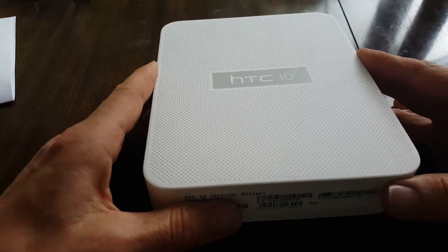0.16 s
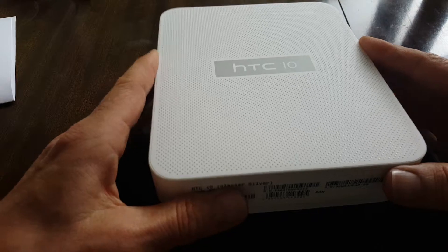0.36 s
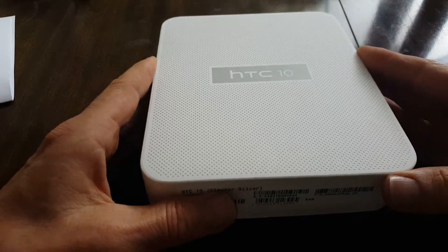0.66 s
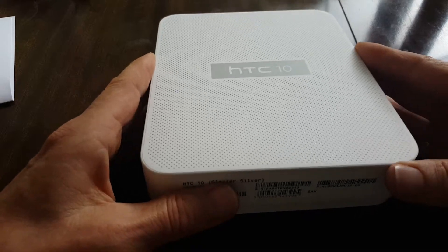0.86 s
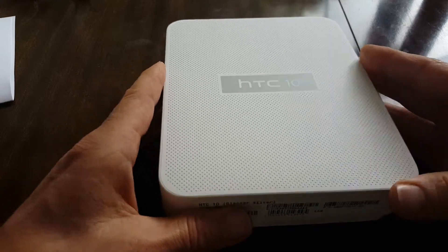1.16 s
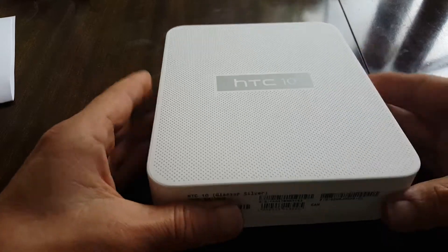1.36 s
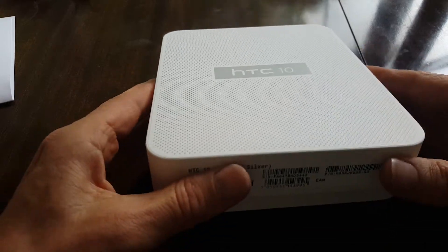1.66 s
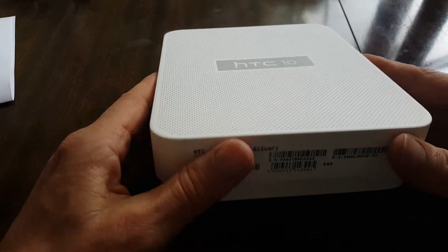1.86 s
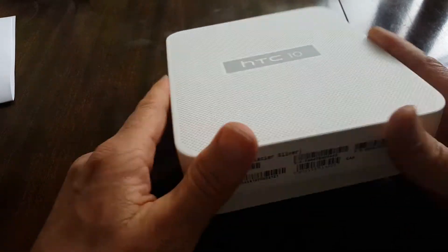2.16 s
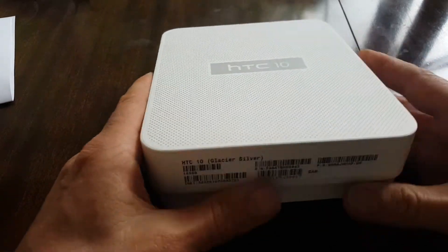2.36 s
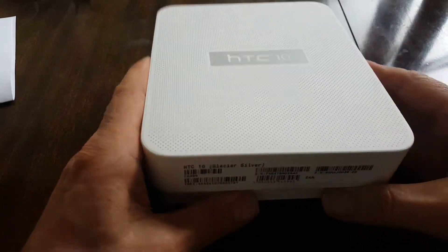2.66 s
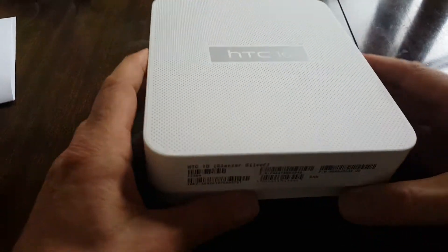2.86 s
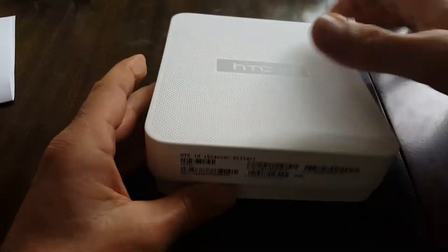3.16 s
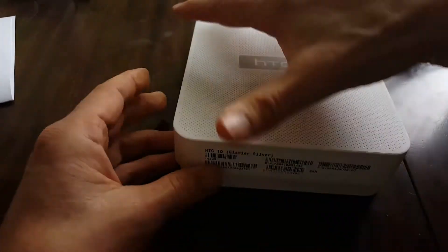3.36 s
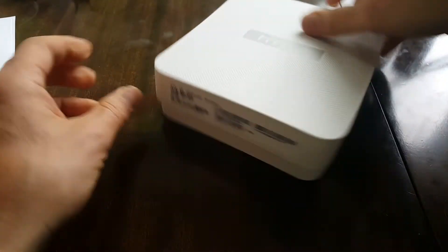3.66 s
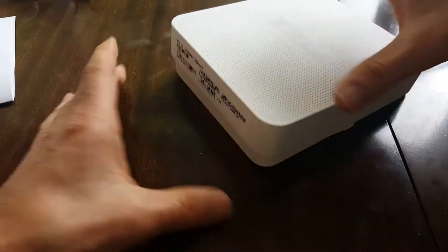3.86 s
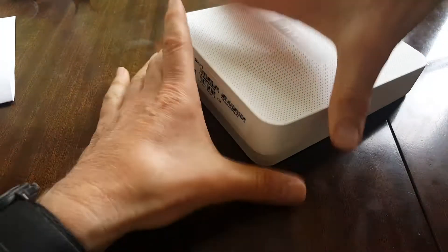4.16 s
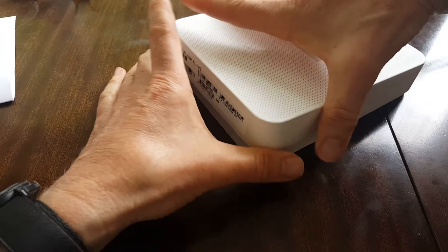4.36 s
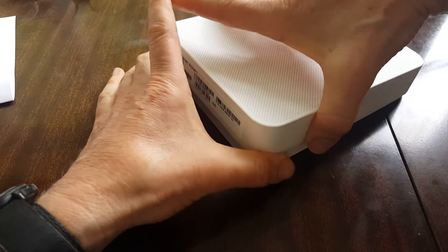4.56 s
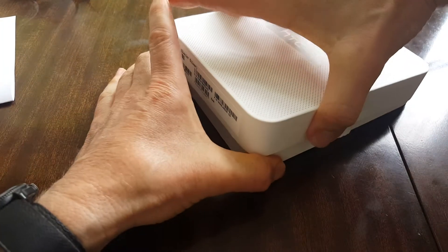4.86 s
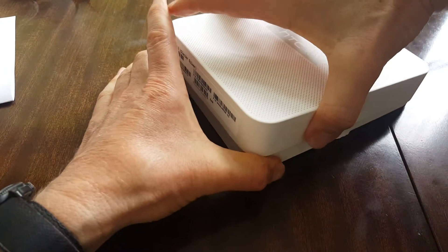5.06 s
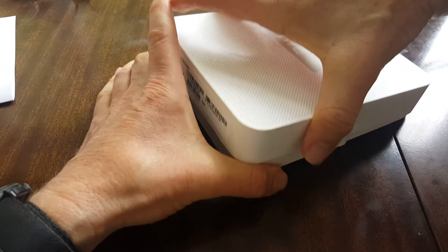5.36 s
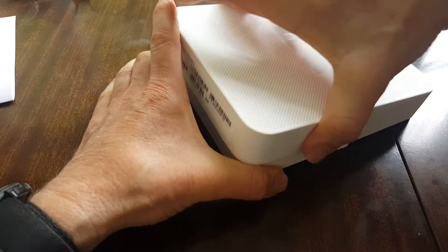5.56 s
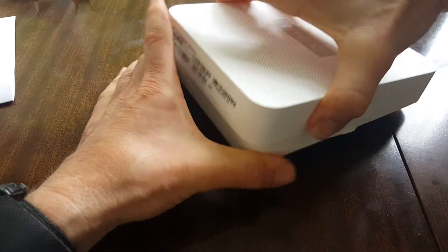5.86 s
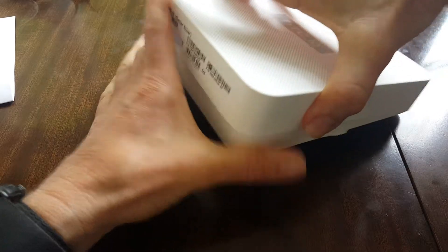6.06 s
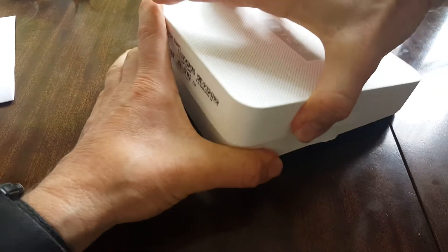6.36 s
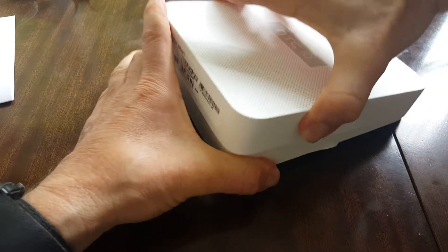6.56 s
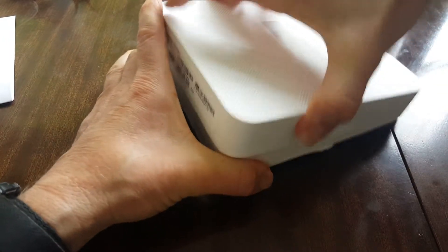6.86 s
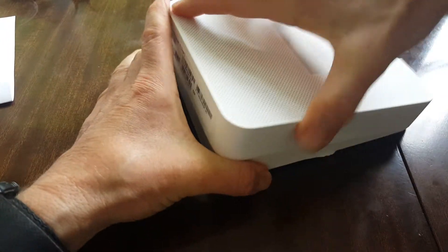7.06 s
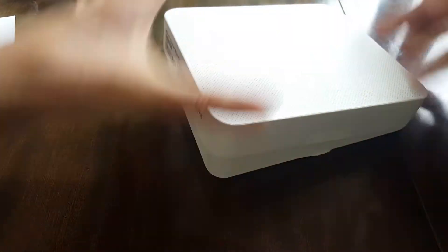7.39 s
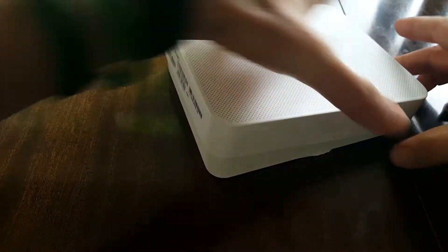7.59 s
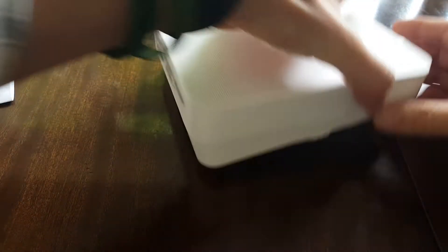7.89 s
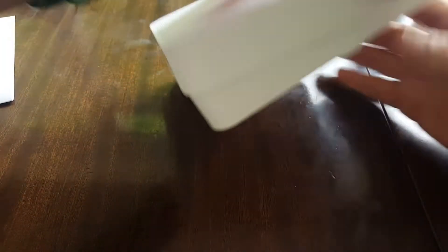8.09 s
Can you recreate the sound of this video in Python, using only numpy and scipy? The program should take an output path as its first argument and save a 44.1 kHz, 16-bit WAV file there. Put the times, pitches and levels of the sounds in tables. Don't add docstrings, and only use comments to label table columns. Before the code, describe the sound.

Light fingertip taps and dry card rubs, then hard hollow box knocks and heavy table thuds in a small quiet furnished room.

```python
import sys
import numpy as np
from scipy import signal
from scipy.fft import rfft, irfft
from scipy.io import wavfile

SR = 44100
rng = np.random.default_rng(int(sys.argv[2]) if len(sys.argv) > 2 else 0)


def voltage_ratio(level):
    return 10 ** (np.asarray(level, float) / 20)


def unload_wav(signal):
    wavfile.write(
        sys.argv[1],
        SR,
        np.round(np.clip(np.atleast_2d(signal).T, -1, 1) * 32767).astype(np.int16),
    )


N = 362943
TIME = np.arange(N) / SR

# (frequency [Hz], level per Hz [dB])
AIR = [(25, 17.5), (108, -6.5), (300, -12), (700, -19), (1100, -17.5), (3500, -25.5), (9000, -33.5),
       (16000, -27)]
AIR_DB = -53
# (frequency [Hz], level [dB])
HUM = [(1361, -70.5), (2724, -82), (2229, -86)]
# (time [s], body rumble [dB], panel rustle [dB])
SHIFT = [
    (0.0, -69, -60.5),
    (3.14, -57, -43.5),
    (3.21, -29.5, -58),
    (3.94, -70.5, -56.5),
    (6.17, -62.5, -64.5),
    (7.17, -69, -37),
    (7.57, -62, -53),
    (8.23, -50, -53),
]
# (time [s], rise [ms], fall [ms], level [dB])
DRAGS = [(0.0, 3, 12.5, -53), (0.203, 5.6, 16.5, -46.5), (0.831, 12.2, 13.4, -47.5), (0.99, 11, 11, -56),
         (1.92, 22, 14, -48), (2.052, 20.6, 16.5, -43), (2.454, 20, 86, -56.5), (3.75, 74, 89, -59),
         (4.252, 16.6, 16, -44.5), (4.369, 32, 60, -57), (4.602, 10, 35, -61.5), (4.716, 25.6, 21, -48),
         (4.81, 13.5, 49, -48), (5.266, 31, 35, -53), (5.506, 41.5, 29, -44.5), (5.603, 17, 10.6, -47.5),
         (5.678, 18, 51, -63), (6.296, 8.4, 18.3, -38.5), (6.371, 28, 22, -48), (6.734, 25, 17, -50),
         (7.13, 15, 43, -44), (7.217, 16, 24, -43.5), (7.28, 18, 55, -44), (6.105, 11.4, 12, -54.5),
         (8.169, 108, 170, -58)]
DRAG_RASP_DB, DRAG_HISS_DB = -23, -20
# (time [s], half length [ms], level [dB], hiss re level [dB])
BRUSHES = [(0.258, 23.5, -49.5, -10), (0.324, 13.4, -59, 4), (0.429, 16.5, -59, -6.5),
           (0.641, 20, -58.5, -11), (1.195, 21, -61, -7), (1.305, 17, -62.5, -3.5), (1.391, 26, -58, -5),
           (1.632, 31, -60.5, 1), (2.172, 20.3, -44.5, -9), (2.323, 10.5, -58, 2.5), (2.46, 23, -63.5, 1.5),
           (2.51, 32, -70, -1), (2.6, 32, -53.5, -17), (2.697, 9.8, -48.5, -0.5), (2.753, 18, -58, -4.5),
           (2.85, 42, -61.5, -2), (3.68, 105, -63, -4), (4.1, 140, -84, 13), (4.865, 15, -58, -4),
           (5.176, 7.2, -44, -11), (5.955, 12.4, -60.5, 0.5), (6.123, 31, -67.5, 6), (6.91, 12, -50, 3),
           (3.08, 25, -57, 0.5), (7.712, 20, -63, -8), (7.82, 32, -59.5, -8), (7.89, 25, -59.5, -11)]
BRUSH_RASP_DB = -4
# (frequency [Hz], level [dB])
BODY = [(70, -25.5), (98, -4), (133, -5), (175, -1), (222, 0), (256, 3.5), (290, -9), (345, 4), (420, -4),
        (500, 2)]
# (frequency [Hz], width [Hz], level [dB])
PANELS = [(620, 362, -2.5), (919, 340, 4), (1090, 250, 4), (1340, 396, 0), (1697, 900, -4.5),
          (2053, 360, -4.5), (2796, 290, -13.5)]
# (time [s], peak [dB], strongest pitch [Hz])
BLOWS = [(0.002, -47, 367), (0.192, -43.5, 292), (0.256, -44, 380), (0.317, -35, 128), (0.628, -46, 347),
         (1.878, -33.5, 383), (2.038, -56, 384), (2.158, -19, 272), (2.488, -34, 229.5), (2.675, -41, 250),
         (2.902, -37.5, 91), (3.103, -16, 360), (6.888, -15.5, 100), (3.232, -14.5, 116),
         (3.304, -16.5, 273), (4.526, -47.5, 150.4), (4.779, -40, 126), (4.819, -29.5, 333),
         (5.443, -36.5, 362), (5.667, -30.5, 142), (6.285, -38.5, 374), (6.456, -30.5, 327),
         (6.508, -20, 290), (6.746, -31.5, 356), (7.211, -26, 151), (7.703, -43, 207), (7.829, -38, 227),
         (8.097, -31.5, 214), (8.168, -39, 241)]
# (time [s], peak [dB], strongest pitch [Hz], rattle [dB], rattle fall [ms])
SLAMS = [(1.441, -17, 290, -37.5, 34), (2.207, -7.5, 260, -39, 43), (2.693, -21.5, 250, -52, 32),
         (3.059, -9, 141, -35, 82), (3.263, -15, 290, -23, 12), (3.39, -20, 154, -33, 17.5),
         (5.181, -27.5, 127.7, -53.5, 16), (6.494, -4.5, 280, -28, 14), (6.893, -13.5, 250, -33, 38),
         (7.096, -12, 358.5, -29, 17), (7.236, -10, 430, -36, 41), (7.46, -16.5, 184, -45, 13)]
RATTLE_LAG_S, RATTLE_RISE_MS, RATTLE_RASP_DB, RATTLE_HISS_DB = 0.004, 2, -34, -39
# (time [s], peak [dB])
JOLTS = [(3.539, -40), (3.597, -31.5), (3.671, -36), (3.794, -36.5), (3.81, -34), (3.854, -39.5),
         (3.918, -35), (4.026, -35.5), (4.14, -43), (4.168, -37.5), (4.255, -37.5), (4.371, -36.5),
         (4.432, -40), (4.464, -40), (4.639, -42), (5.334, -41.5), (5.769, -38.5), (5.953, -40.5),
         (5.997, -39.5), (6.068, -41.5), (6.099, -38), (6.149, -44), (6.181, -38), (6.225, -37.5),
         (6.313, -28), (6.381, -31.5), (6.433, -36), (6.854, -36)]
JOLT_HZ, JOLT_RISE_HZ_PER_S = 196.4, 20
JOLT_TAP_DB, JOLT_TAP_HZ = -10.5, 860
# (time [s], peak [dB], panel pitch [Hz], body [dB])
TAPS = [(0.3156, -31.5, 1000, -66), (0.5952, -36.5, 1116, -43.5), (0.82, -36, 724, -38),
        (0.933, -42, 910, -44), (1.0974, -43, 960, -47), (1.132, -35, 1050, -35.5),
        (1.174, -37.5, 1010, -65), (1.363, -37.5, 1330, -47.5), (1.5956, -30.5, 1115, -35.5),
        (1.833, -36.5, 880, -42), (2.0993, -33, 900, -42), (2.3613, -34, 520, -28.5),
        (2.446, -26.5, 600, -31.5), (2.5146, -30, 860, -34.5), (2.609, -34, 1090, -38),
        (2.7852, -32.5, 695, -37), (3.4232, -25.5, 520, -25), (3.5813, -45, 1280, -56),
        (3.8361, -32, 1740, -54), (3.9, -31.5, 2370, -38), (4.7755, -34.5, 1020, -34),
        (4.8036, -28, 650, -42), (4.898, -34, 577, -32), (5.1718, -37, 1120, -40), (5.666, -31.5, 604, -44),
        (5.94, -38, 950, -54), (6.8922, -10, 940, -44), (7.123, -16, 710, -20), (7.2682, -25, 543, -28),
        (7.4578, -25, 493, -39)]
TAP_EDGE_DB, TAP_TICK_DB, TAP_BODY_HZ = -18, -43.5, 260.4
# (time [s], peak [dB], panel pitch [Hz], edge [dB])
KNOCKS = [(1.4305, -4, 1350, -29), (1.4404, -12, 870, -27), (1.8787, -26.5, 960, -51),
          (2.1573, -21, 900, -18.5), (2.1717, -23.5, 890, -39), (2.194, -15, 1200, -17.5),
          (2.2061, -4.5, 744, -27), (2.2367, -6, 620, -21), (2.2634, -30, 547, -59.5),
          (2.2939, -21.5, 670, -51), (2.343, -29, 770, -50), (2.6995, -23.5, 630, -54.5),
          (2.7479, -24.5, 1030, -52), (3.0554, -4, 1130, -36), (3.0651, -9.5, 1450, -37),
          (3.1033, -8, 1490, -16), (3.131, -14, 1450, -20), (3.23, -9.5, 2270, -10),
          (3.2672, -9.5, 1370, -5), (3.2712, -12.5, 1500, -12), (3.302, -17.5, 1480, -5),
          (3.3258, -20.5, 1350, -46), (3.38, -23, 780, -58.5), (3.394, -14.5, 493, -10.5),
          (6.4675, -21, 480, -19), (6.4886, -10, 1074, -14), (6.4939, -7, 770, -2),
          (6.8858, -7.5, 950, -22), (7.096, -10, 567, -45), (7.2366, -11, 577, -42)]
KNOCK_TICK_DB = -34.5
# (time [s], edge [dB], tick [dB])
CLICKS = [(0.25, -23, -33.5), (0.3146, -62, -34.5), (0.339, -23.5, -46), (0.414, -26.5, -70),
          (1.132, -25, -44), (1.1735, -60, -44), (1.206, -65, -50), (1.363, -56, -61), (2.0998, -22, -41),
          (2.106, -55.5, -41.5), (2.1575, -26.5, -18), (2.5156, -14.5, -35.5), (2.5798, -22, -67),
          (2.693, -25, -43), (2.7481, -55, -45), (2.8567, -58, -38.5), (3.0565, -41, -40),
          (3.2006, -17.5, -36.5), (3.3015, -26, -53), (3.3975, -48, -30.5), (3.4376, -23, -54),
          (3.648, -25, -43.5), (3.672, -30, -62), (5.1717, -28, -48), (6.4693, -46, -31.5),
          (7.2387, -52, -35), (7.2456, -16.5, -62), (7.831, -25.5, -36), (8.1086, -24, -68),
          (8.209, -33, -56)]
CLICK_PANEL_DB, CLICK_PANEL_HZ = -31, 1100
# (time [s], peak [dB], panel pitch [Hz], edge [dB], tick [dB])
NICKS = [(0.424, -47, 860, -52, -57), (1.401, -46, 1240, -50, -58), (2.162, -24, 939, -36, -36),
         (2.211, -11, 855, -33, -50), (2.226, -23, 790, -40, -58), (2.252, -20.5, 1160, -42, -50),
         (2.906, -54, 1360, -35, -52), (3.0995, -14.5, 824, -40, -58), (3.151, -24, 1370, -42, -58),
         (3.25, -23, 1470, -38, -35), (3.483, -59, 824, -50, -53), (4.139, -58, 1520, -38, -63),
         (4.225, -41, 1120, -52, -52), (4.254, -31, 1170, -53, -43), (4.349, -42, 982, -52.5, -55),
         (4.596, -45.5, 946, -54, -65), (4.846, -36.5, 900, -48, -47.5), (4.934, -45, 1090, -44, -63),
         (4.978, -60, 1350, -40, -53.5), (5.152, -50, 1133, -46.5, -59), (5.173, -34.5, 1100, -41, -52),
         (5.223, -43, 1430, -50, -50), (5.338, -49, 1050, -50, -58), (5.424, -48, 1130, -57, -62),
         (2.1915, -31.5, 1114, -37, -33.5), (7.125, -35, 1060, -48, -54), (6.095, -55, 980, -46, -51),
         (6.277, -67, 1340, -55, -50), (7.081, -32, 930, -48, -70), (7.21, -28.5, 905, -36, -51),
         (7.58, -46, 1270, -36, -52.5), (7.702, -39.5, 1000, -30, -61), (7.762, -61, 1350, -57, -67),
         (8.16, -44, 1400, -29, -61)]
CRACK_DB, CRACK_T60_S = -11.5, 0.0095
TICK_TAIL_DB, TICK_TAIL_T60_S = -18, 0.041
# (time [s], peak [dB], pitch [Hz])
SNAPS = [(1.431, -19, 1900), (2.195, -11, 2200), (2.2065, -14, 1500), (2.237, -23, 1600),
         (3.0562, -19, 1480), (3.2305, -8.5, 2400), (3.267, -12, 2000), (3.3025, -13, 2200),
         (3.327, -23.5, 2510), (6.489, -15.5, 1970), (6.494, -13, 1910), (6.8855, -8.5, 2170),
         (7.0965, -18, 2000), (7.24, -27, 2600), (7.27, -39, 2500), (0.505, -46, 1800), (3.345, -37, 1500)]
# (time [s], peak [dB], pitch [Hz])
POPS = [(1.431, -10, 474), (1.441, -17, 490), (1.465, -26, 470), (2.168, -25, 520), (2.226, -29, 704),
        (2.262, -25, 600), (2.312, -29, 790), (3.058, -19, 600), (3.381, -17, 803), (4.333, -45, 773),
        (4.367, -38, 980), (4.688, -45, 480), (4.705, -35, 470), (4.706, -34, 1090), (4.716, -34, 497),
        (4.725, -36, 520), (4.825, -35, 1000), (4.891, -35.5, 547), (5.248, -48, 780), (5.357, -48.5, 930),
        (5.445, -43, 970), (5.456, -36, 1110), (5.485, -43, 610), (5.586, -33, 1040), (6.455, -34, 450),
        (6.503, -18, 516), (6.518, -20, 484), (6.55, -21.5, 497), (6.888, -20, 465), (6.9, -19, 463),
        (6.91, -28, 620), (6.945, -24, 477), (7.064, -36, 550), (7.105, -26, 480), (7.245, -16.5, 500),
        (2.24, -14, 560), (1.138, -35, 379), (6.168, -41, 300), (6.252, -42, 320), (6.322, -31, 280),
        (6.285, -36, 500)]
# (time [s], peak [dB], pitch [Hz])
RINGS = [(1.3625, -34.5, 1260), (1.4315, -15, 2200), (1.441, -21, 2200), (3.0565, -8.5, 1220),
         (3.104, -6.5, 1410), (3.1315, -14.5, 1500), (3.2305, -15.5, 2400), (3.251, -27, 1400),
         (3.2715, -10, 1500), (3.303, -16.5, 1430), (3.836, -32, 1730), (6.469, -20.5, 1126),
         (6.4945, -14.5, 1850), (6.886, -14, 1120), (7.097, -26, 2300), (2.1955, -19, 1350),
         (2.2375, -20, 1510), (4.777, -40, 1050), (3.4, -18, 2050), (1.8, -40, 800), (6.139, -49, 3650),
         (6.162, -48, 3650), (6.252, -54, 2200), (5.942, -43, 2850), (1.3, -49, 800), (6.29, -44, 2800),
         (3.3275, -27, 2200), (2.344, -27, 900), (7.097, -16, 1020)]
# (frequency [Hz], level re blow [dB], time to fall 60 dB [s])
TABLE = [(59.9, -22, 0.1), (76.4, -11.5, 0.13), (103, -16.5, 0.18)]
TABLE_SWELL_S = 0.032
# (time [s], level [dB])
BOOMS = [
    (1.437, -17),
    (2.159, -18),
    (3.063, -24),
    (3.394, -13),
    (4.16, -24),
    (5.399, -26.5),
    (6.896, -7),
    (7.096, -1),
    (7.236, -30),
    (7.701, -20),
]
BUZZ_DB, BUZZ_T60_S = -6.5, 0.11
BUZZ_LATE_DB, BUZZ_LATE_T60_S = -13, 0.43
# (time [s], frequency [Hz], level [dB], time to fall 60 dB [s])
JINGLE = [
    (6.901, 6870, -51, 0.25),
    (6.899, 6150, -52, 0.1),
    (6.9, 5650, -61, 0.45),
    (6.9, 8250, -51, .15),
    (7.26, 4950, -60, 0.4),
]
# (frequency [Hz], level [dB])
SIDE_DB = [(60, -19), (500, -13), (1000, -6.5), (4000, -1.5), (8000, 2), (13000, -2.5)]
# (frequency [Hz], time to fall 60 dB [s], level [dB])
ROOM = [(90, 0.4, -21.5), (250, 0.45, -14.5), (600, 0.19, -11), (1200, 0.82, -20.5), (2244, 0.4, -4),
        (5000, 0.2, 6.5), (10000, .2, -17)]
# (frequency [Hz], level [dB])
MIC = [(9000, -1.5), (10300, -6), (13700, -1), (14600, -12.5), (15600, -1), (15900, -39)]
# (frequency [Hz], level [dB])
LEAN_DB = [(300, 0.2), (600, -0.3), (1100, 1.3), (2200, 2.5), (4200, -2.5), (8000, -2), (13000, 1.5)]


def unit(x):
    return x / np.sqrt(np.mean(x ** 2))


def band(x, lo_hz, hi_hz, order=2):
    limits = [lo_hz, min(hi_hz, 0.49 * SR)]
    return signal.sosfilt(signal.butter(order, limits, "band", fs=SR, output="sos"), x)


def sine(hz, t):
    return np.sin(2 * np.pi * hz * t)


def decay(t, t60):
    return np.exp(-np.log(1000) * t / max(t60, 0.002))


def add(out, s, x):
    i = max(int(s * SR), 0)
    out[i:i + len(x)] += x[:N - i]


def curve(table):
    hz, db = np.transpose(table)
    bins = np.arange(N // 2 + 1) * SR / N
    return np.interp(np.log(bins + 1), np.log(hz), db)


def colour(x, table, turn=1):
    return irfft(turn * rfft(x) * voltage_ratio(curve(table)), N)


def wander(rate):
    count = int(rate * N / SR)
    return np.interp(TIME, np.linspace(0, N / SR, count), rng.standard_normal(count))


def alike(count):
    mid, side = rng.standard_normal((2, count))
    treble = signal.sosfilt(signal.butter(2, 800, "high", fs=SR, output="sos"), side)
    side = treble + 0.15 * side
    return np.array([mid + side, mid - side])


def air():
    phase = np.array([[0], [1.5]])
    whine = sum(voltage_ratio(db) * np.sqrt(2) * np.sin(2 * np.pi * hz * TIME + phase) for hz, db in HUM)
    return voltage_ratio(AIR_DB + 0.65 * wander(5.2)) * unit(colour(alike(N), AIR)) + whine


def grit(rate, scatter_db):
    size = np.minimum(rng.exponential(size=N), 3)
    happens = rng.random(N) < rate / SR
    slipped = happens * voltage_ratio(scatter_db * size) * rng.choice([-1, 1], size=N)
    return unit(slipped) + 0.35 * rng.standard_normal(N)


def resonate(x, modes):
    total = 0
    for k, (hz, width, db) in enumerate(modes):
        b, a = signal.iirpeak(hz, hz / width, fs=SR)
        total = total + (-1) ** k * voltage_ratio(db) * signal.lfilter(b, a, x)
    return unit(total)


def slips():
    rattles = [(s + RATTLE_LAG_S, RATTLE_RISE_MS, fall, db, RATTLE_RASP_DB, RATTLE_HISS_DB)
               for s, _, _, db, fall in SLAMS]
    drags = [(*row, DRAG_RASP_DB, DRAG_HISS_DB) for row in DRAGS]
    brushes = [(s, half, half, db, hiss + BRUSH_RASP_DB, hiss) for s, half, db, hiss in BRUSHES]
    return rattles + drags + brushes


def rubbing():
    rough = grit(3000, 0.94)
    panel = resonate(rough, PANELS)
    body = resonate(grit(300, 2.6), [(hz, 30.0, db) for hz, db in BODY])
    rasp = unit(band(rough, 2000, 5500))
    hiss = unit(band(grit(5000, 4.0), 5500, 15800))
    force = np.zeros((3, N))
    for s, rise, fall, db, rasp_db, hiss_db in slips():
        i, j = max(int((s - 0.25) * SR), 0), int((s + 0.5) * SR)
        ms = (TIME[i:j] - s) * 1000
        shape = np.where((ms > 0) & (rise < 5), 1.1, 2)
        length = np.where(ms < 0, max(rise, 1), max(fall, 1))
        bump = voltage_ratio(-6 * np.abs(ms / length) ** shape)
        level = voltage_ratio(db + np.array([0, rasp_db, hiss_db]))[:, None]
        force[:, i:j] += (level * bump) ** 2
    s, body_db, panel_db = np.transpose(SHIFT)
    force[0] += voltage_ratio(np.interp(TIME, s, panel_db) - 19.0) ** 2
    jerks = voltage_ratio(np.array([[2.5], [2.5], [1.5]]) * wander(160))
    on_panel, on_rasp, on_hiss = np.sqrt(force) * jerks
    on_body = np.hypot(voltage_ratio(np.interp(TIME, s, body_db) - 5.5), voltage_ratio(2.0) * on_panel)
    return on_body * body + on_panel * panel + on_rasp * rasp + on_hiss * hiss


def blows():
    slams = [row[:3] for row in SLAMS]
    tapped = [(s, db, TAP_BODY_HZ) for s, _, _, db in TAPS]
    start = JOLTS[0][0]
    jolts = [(s, db, JOLT_HZ + JOLT_RISE_HZ_PER_S * (s - start)) for s, db in JOLTS]
    return slams + BLOWS + tapped + jolts


def thumps():
    out, t = np.zeros(N), TIME[:int(SR / 5)]
    rows = blows()
    chance = rng.standard_normal((len(rows), len(BODY), 2))
    for (s, db, hz), luck in zip(rows, chance):
        ring = sine(hz, t) * decay(t, 0.047)
        for (mode_hz, mode_db), (size, drift) in zip(BODY, luck):
            gain = size * voltage_ratio(mode_db - 4.0 - 3.5 * abs(np.log2(mode_hz / hz)))
            fade = decay(t, 0.058 * (250 / mode_hz) ** 0.1)
            ring = ring + gain * sine(mode_hz * (1 + 0.05 * drift), t) * fade
        ring = ring * (1 - np.exp(-t / 0.00073))
        add(out, s - 0.001, voltage_ratio(db) * ring / np.abs(ring).max())
    return out


def contacts():
    knocks = [(s, db, hz, edge, edge + KNOCK_TICK_DB) for s, db, hz, edge in KNOCKS]
    fingers = [(s, db, hz, db + TAP_EDGE_DB, db + TAP_TICK_DB) for s, db, hz, _ in TAPS]
    clicks = [(s, edge + CLICK_PANEL_DB, CLICK_PANEL_HZ, edge, tick) for s, edge, tick in CLICKS]
    faint = [(s, db + JOLT_TAP_DB) for s, db in JOLTS]
    jolts = [(s, db, JOLT_TAP_HZ, db + TAP_EDGE_DB, db + TAP_TICK_DB) for s, db in faint]
    return knocks + fingers + clicks + jolts


def taps(rows):
    out, t = np.zeros(N), TIME[:int(SR / 20)]
    chance = rng.standard_normal((len(rows), len(PANELS) * 2 + len(t)))
    noise = chance[:, -len(t):]
    tick_fade = decay(t, 0.006) + voltage_ratio(TICK_TAIL_DB) * decay(t, TICK_TAIL_T60_S)
    edges = unit(band(noise, 1600, 4200)) * decay(t, 0.012)
    ticks = unit(band(noise, 4200, 15800)) * tick_fade
    cracks = unit(band(noise, 750, 2190)) * decay(t, CRACK_T60_S)
    soft = 1 - np.exp(-t / 0.00063)
    for row, luck, edge, tick, crack in zip(rows, chance, edges, ticks, cracks):
        s, db, hz, edge_db, tick_db = row
        ring = sine(hz, t) * decay(t, 9 / hz)
        for k, (panel_hz, width, panel_db) in enumerate(PANELS):
            gain = voltage_ratio(panel_db - 13.0 + 3 * luck[2 * k])
            pitch = panel_hz * (1 + 0.15 * luck[2 * k + 1])
            ring = ring - gain * sine(pitch, t) * decay(t, 5.1 / width)
        hit = voltage_ratio(db) * (ring / np.abs(ring).max() + voltage_ratio(CRACK_DB) * crack)
        hit = hit + voltage_ratio(edge_db - 14.5) * edge + voltage_ratio(tick_db + 1.5) * tick
        add(out, s, soft * hit)
    return out


def swings(rows, cycles):
    out, t = np.zeros(N), TIME[:int(SR / 20)]
    for s, db, hz in rows:
        add(out, s, -voltage_ratio(db) * sine(hz, t) * decay(t, cycles / hz))
    return out


def snaps():
    return swings(SNAPS, 2.5)


def wall_pops():
    return swings(POPS, 9.4)


def lid_rings():
    return swings(RINGS, 17.6)


def table_booms():
    out, t = np.zeros(N), TIME[:int(SR / 3)]
    chance = rng.standard_normal((len(BOOMS), len(TABLE), 2))
    swell = 1 - np.exp(-t / TABLE_SWELL_S)
    for (s, db), luck in zip(BOOMS, chance):
        boom = np.zeros(len(t))
        for (hz, mode_db, t60), (size, drift) in zip(TABLE, luck):
            boom += voltage_ratio(mode_db + 2 * size) * sine(hz * (1 + 0.056 * drift), t) * decay(t, t60)
        add(out, s, voltage_ratio(db) * boom * swell)
    return out


def buzz():
    force, t = np.zeros(N), TIME[:SR // 2]
    fade = decay(t, BUZZ_T60_S) + voltage_ratio(BUZZ_LATE_DB) * decay(t, BUZZ_LATE_T60_S)
    for s, _, _, db, _ in SLAMS:
        add(force, s + RATTLE_LAG_S, voltage_ratio(db + BUZZ_DB) * fade)
    return force * unit(band(grit(6000, 1.5), 900, 2500, order=3))


def jingle():
    out, t = np.zeros(N), TIME[:SR // 2]
    shake = wander(180)[:SR // 2]
    for s, hz, db, t60 in JINGLE:
        add(out, s, voltage_ratio(db) * sine(hz, t) * decay(t, t60) * shake)
    return out


def ports(x):
    side = colour(x, SIDE_DB, turn=1j) * (0.5 + wander(25))
    return np.array([x + side, x - side])


def room(x):
    t = TIME[:int(0.7 * SR)]
    tail = 0
    for hz, t60, db in ROOM:
        echo = unit(band(alike(len(t)), hz / 3.15, hz * 1.64))
        tail = tail + voltage_ratio(db) * echo * decay(t, t60) / np.sqrt(t60 * hz)
    tail = 0.12 * tail * (1 - np.exp(-(t / 0.00055) ** 2))
    return signal.fftconvolve(x[None], tail, axes=1)[:, :N]


def scene():
    box = rubbing() + thumps() + taps(contacts()) + taps(NICKS)
    box = box + snaps() + wall_pops() + lid_rings() + buzz() + jingle()
    return air() + ports(box) + room(box) + table_booms()


def band_limit(x):
    return signal.sosfilt(signal.butter(12, 16490, fs=SR, output="sos"), x)


def record(dry):
    balance_db, drive, gain_db = 2.5, 0.49, 1.18
    lean = voltage_ratio(np.array([[0.5], [-0.5]]) * (balance_db + curve(LEAN_DB)))
    heard = colour(dry, MIC, turn=lean)
    heard = signal.sosfilt(signal.butter(4, 59, "high", fs=SR, output="sos"), heard)
    mix = voltage_ratio(gain_db) * np.tanh(drive * heard) / drive
    return band_limit(mix)


dry = scene()
out = record(dry)
unload_wav(out)
```